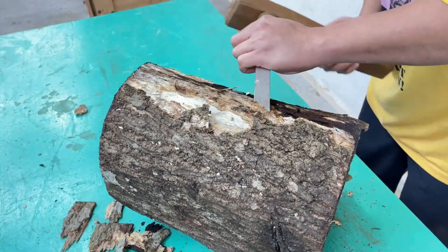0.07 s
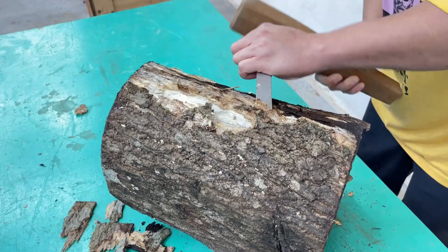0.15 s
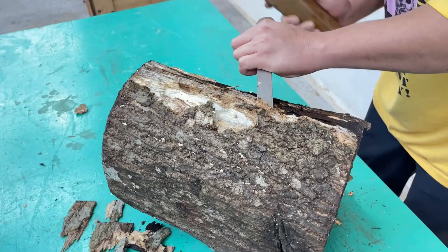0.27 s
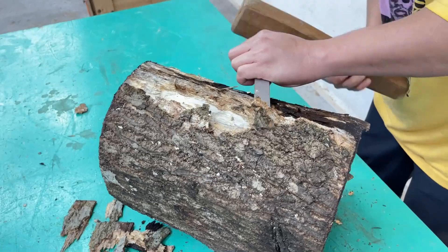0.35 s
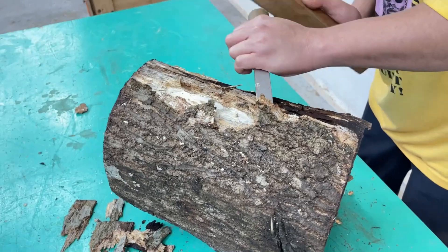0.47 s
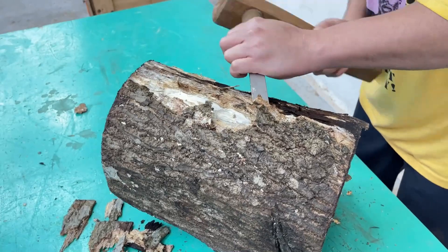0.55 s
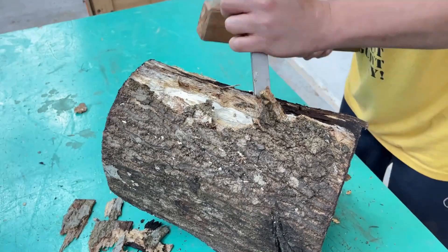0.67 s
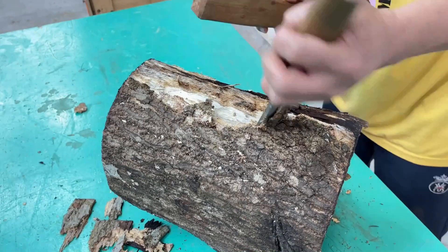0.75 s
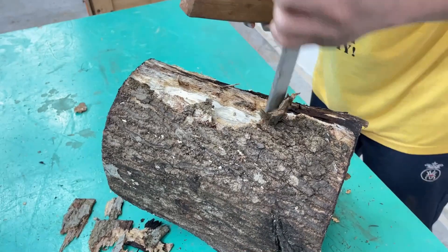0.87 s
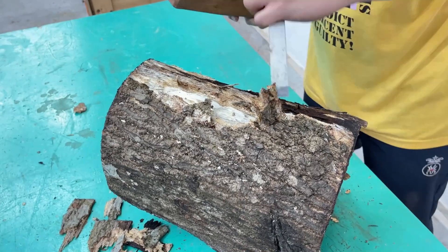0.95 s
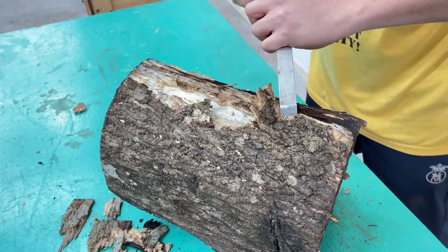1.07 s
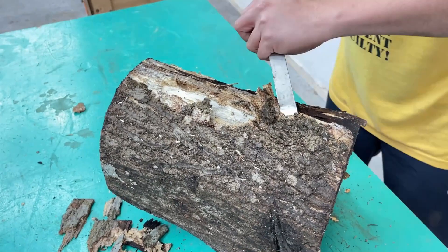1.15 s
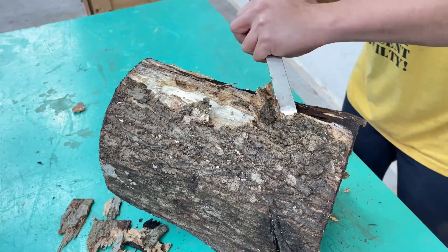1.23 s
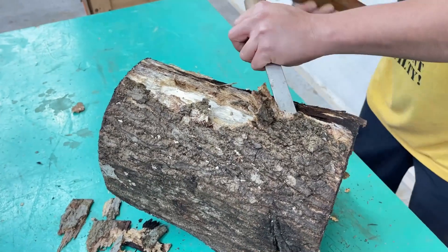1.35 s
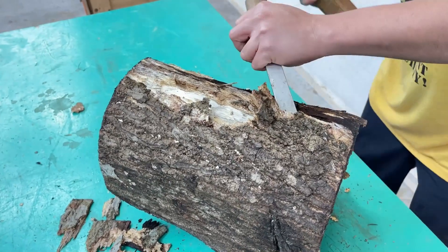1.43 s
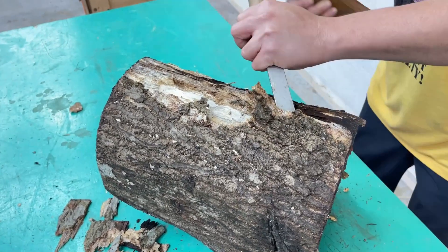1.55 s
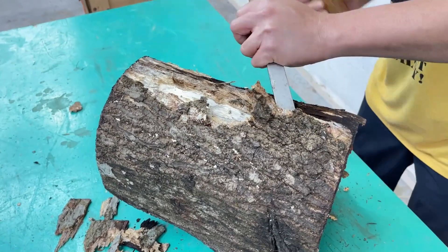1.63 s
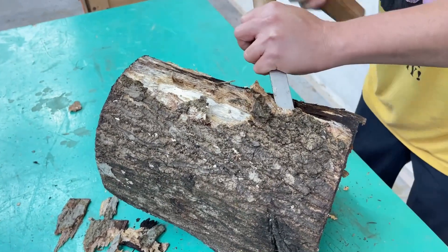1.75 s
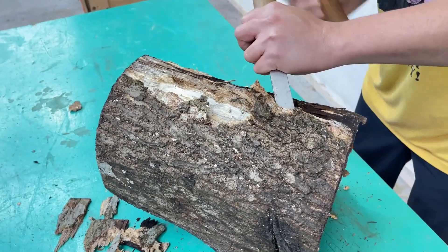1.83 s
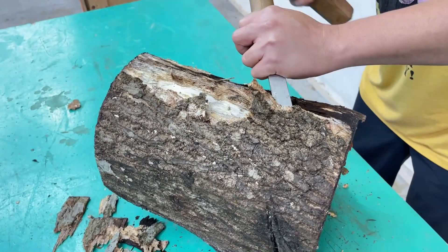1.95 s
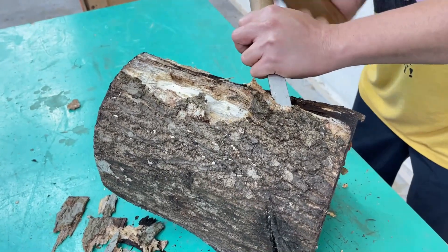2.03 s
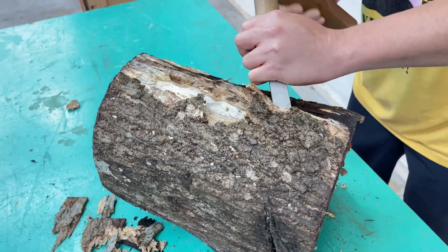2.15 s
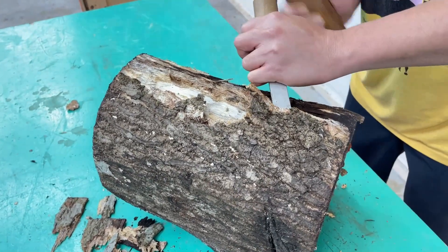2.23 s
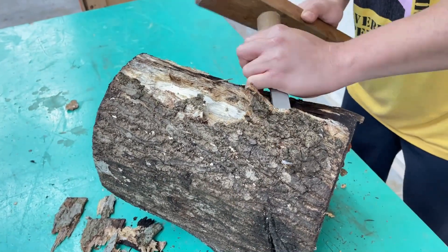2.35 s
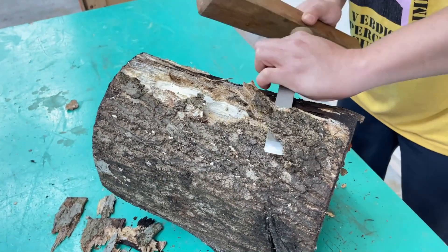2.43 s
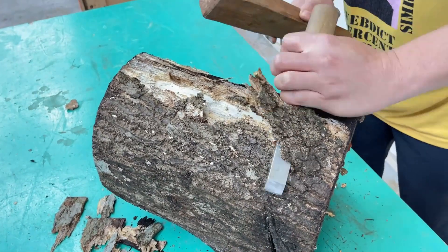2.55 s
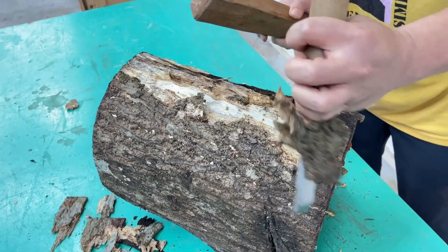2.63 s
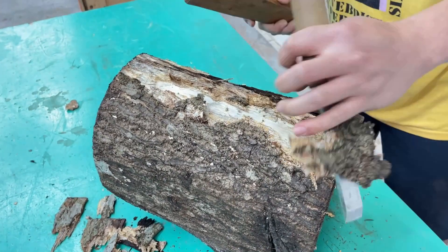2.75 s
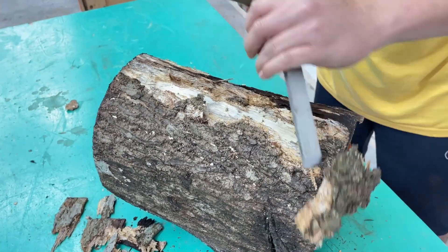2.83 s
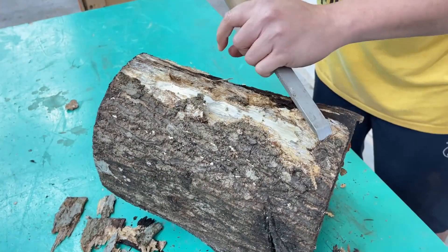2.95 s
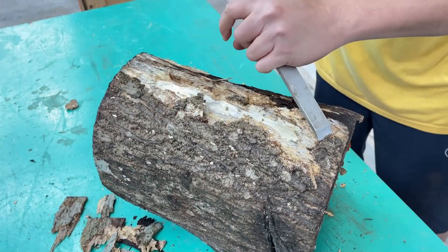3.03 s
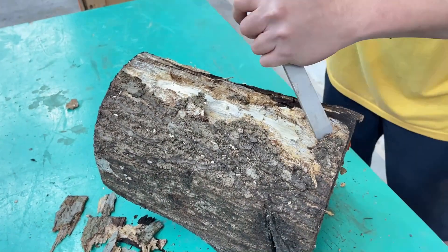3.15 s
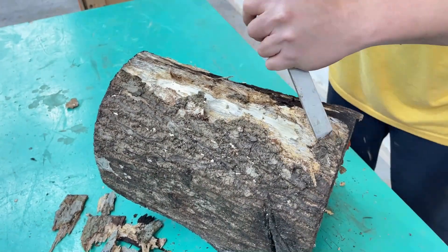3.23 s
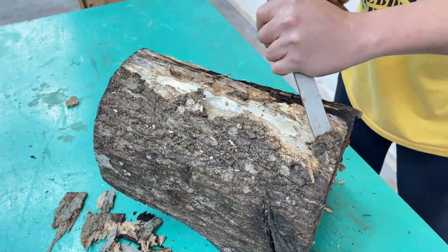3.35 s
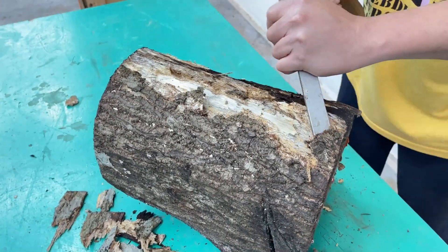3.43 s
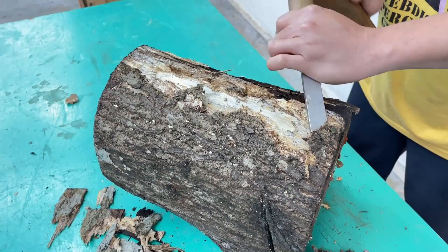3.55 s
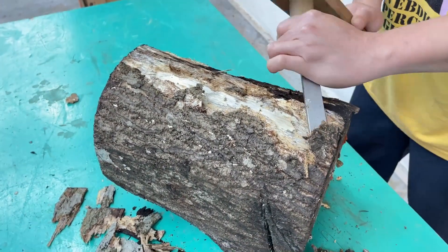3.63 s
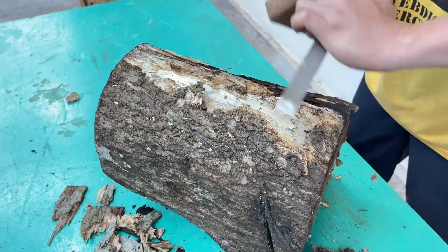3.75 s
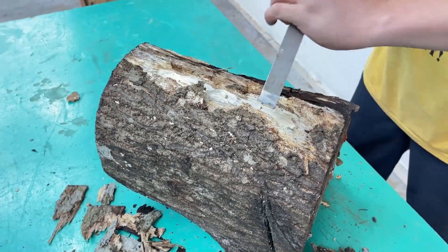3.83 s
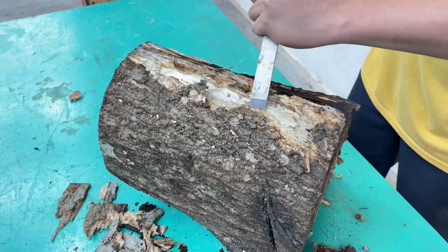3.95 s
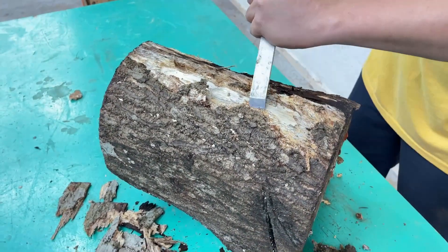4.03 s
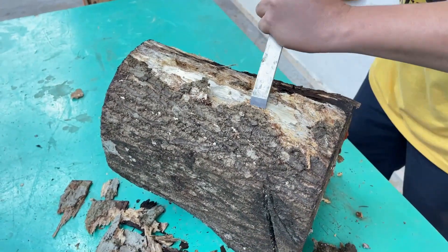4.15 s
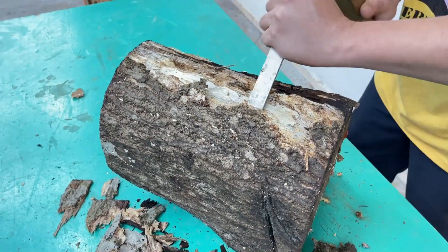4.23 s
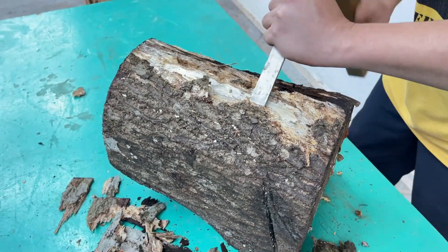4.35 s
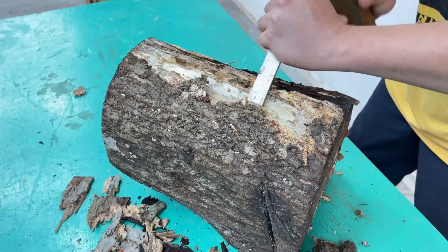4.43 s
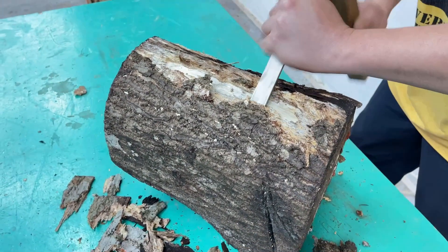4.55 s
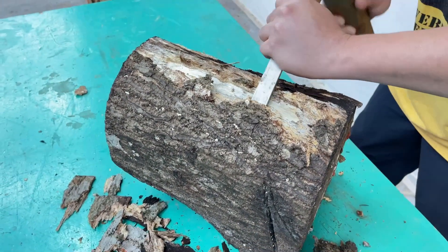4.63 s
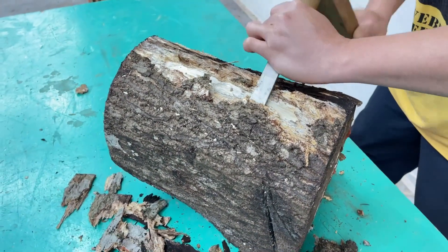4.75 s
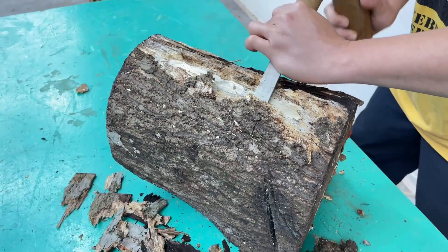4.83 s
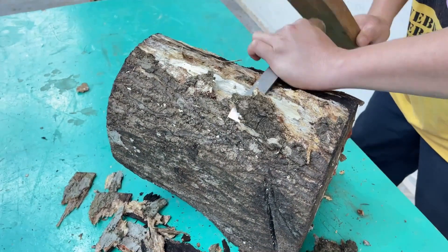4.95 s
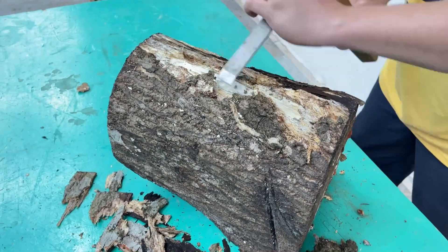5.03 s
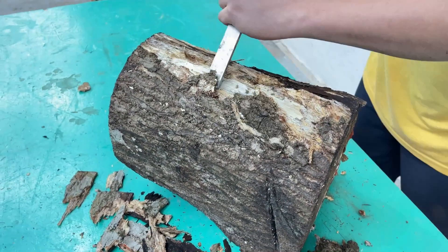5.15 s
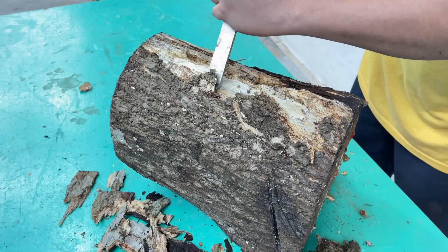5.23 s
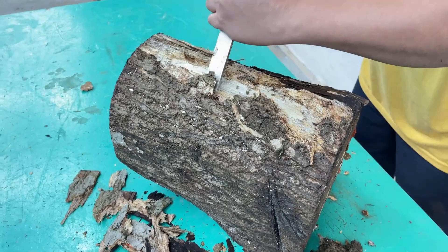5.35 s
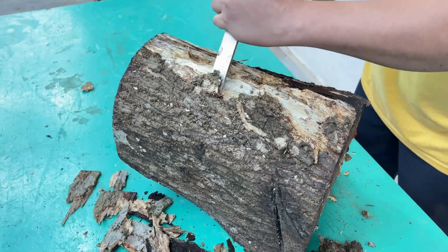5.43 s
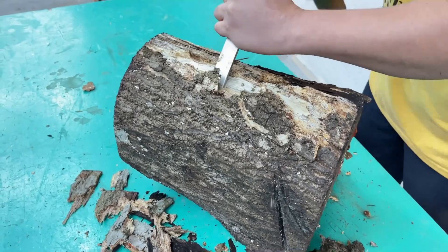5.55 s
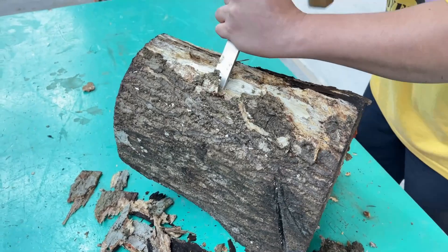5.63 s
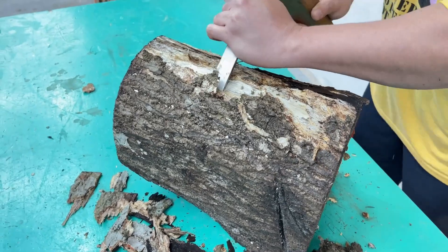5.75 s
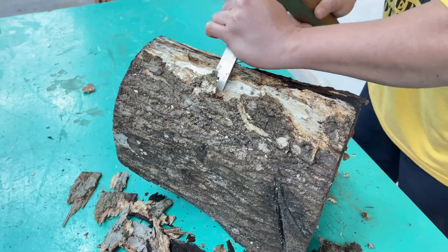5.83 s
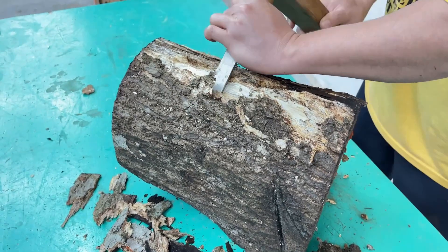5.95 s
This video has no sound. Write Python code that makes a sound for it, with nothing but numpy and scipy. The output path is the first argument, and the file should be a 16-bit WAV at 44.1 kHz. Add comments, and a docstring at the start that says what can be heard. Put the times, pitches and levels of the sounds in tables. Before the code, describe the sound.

A wooden mallet drives a steel blade under log bark in quick, ringing taps, with bark crackling and crumbling between volleys in an echoing workshop.

```python
"""A wooden mallet drives a steel blade under the bark of a log on a workshop table. A volley is under way
at the start: each impact cracks fibres and excites the modes of log, handle, mallet and blade; the hard
walls reverberate, and the rocking log and table thump and rumble. Bark crumbles and falls before and
after a second volley (1.3-2.3 s). At 3 s a freed slab lands with a hollow knock and four blows follow.
Near 4 s the blade scrapes, then eight more blows fall. A faint hiss lies under it all."""
import sys
import numpy as np
from scipy import signal
from scipy.fft import rfft, irfft
from scipy.io import wavfile
from scipy.ndimage import uniform_filter1d

SR = 44100
rng = np.random.default_rng(int(sys.argv[2]) if len(sys.argv) > 2 else 0)


def wav_record(signal):
    """Record a signal, one row per channel, as 16-bit PCM in the file named by sys.argv[1]."""
    frames = np.transpose(np.atleast_2d(signal))
    bounded = np.clip(frames, -1, 1)
    # unit amplitude maps onto the largest positive 16-bit level
    quanta = np.round(bounded * 32767).astype(np.int16)
    wavfile.write(sys.argv[1], SR, quanta)


N = 264159
LEAD = SR // 4  # samples ahead of t = 0, so that a blow already struck still echoes

# Mallet blows: crack t/s, level/dB of handle, blade, crack, log and mallet, force rise t/s, left-right/dB
BLOWS = [(-0.094, -22, -26.5, -19.5, -28.5, -19.5, 0.0035, 16),
         (0.0781, -26.5, -27.5, -20, -32, -29, 0.0095, -6.5),
         (0.2214, -25, -24.5, -18.5, -31, -24, 0.0083, -10), (0.4134, -25, -25, -18, -34.5, -33, 0.007, -1),
         (0.574, -21.5, -20.5, -15, -38.5, -31.5, 0.0058, 14),
         (1.3427, -21, -20, -13, -32.5, -22, 0.0045, -1),
         (1.5458, -20, -22.5, -11.5, -36, -13.5, .0026, -3.5),
         (1.7347, -16.5, -20, -13, -38, -21.5, 0.0026, -3),
         (1.921, -21, -22.5, -15, -42.5, -30.5, 0.0053, 1.5),
         (2.1197, -27.5, -25.5, -18.5, -39, -32, 0.0056, -11),
         (2.3174, -25, -26.5, -16, -44.5, -29.5, 0.0034, -12),
         (3.2515, -33.5, -34.5, -22, -41.5, -21, 0.0067, -2),
         (3.419, -23, -23.5, -13.5, -28.5, -26, 0.0078, -0.5),
         (3.5553, -20.5, -18.5, -9, -38.5, -25, 0.0039, 0.5),
         (3.6702, -27.5, -29.5, -25, -27, -32, 0.0027, 17.5),
         (4.2614, -21, -22, -14, -28.5, -20.5, 0.00296, 7.5),
         (4.4456, -20.5, -21.5, -13, -34, -28.5, 0.0031, 3.5),
         (4.6354, -22.5, -21.5, -11, -33.5, -29, 0.0043, -8.5),
         (4.814, -20, -19, -8, -26, -23.5, 0.0048, -0.5),
         (4.9479, -29.5, -29, -27, -41, -24.5, 0.0065, 16.5),
         (5.3904, -14, -16, -9.5, -23, -19.5, 0.001, 3), (5.575, -24, -22, -16.5, -36, -22, 0.01, -12),
         (5.7453, -27, -24.5, -14, -41, -34, 0.0062, 5)]
# Normal modes of each body: f/Hz, relative level/dB, T60/s
LOG_MODES = [(232.6, 2.5, 0.048), (245.4, 4.5, 0.0093), (377, -2.5, 0.0041)]
HANDLE_MODES = [(529, -1, 0.015), (773, 2, 0.012), (1050, 1, 0.012), (1230, -3, 0.014)]
MALLET_MODES = [(1408, 7.5, 0.034), (1540, -8, 0.022), (1378, -14.5, 0.45)]
BLADE_MODES = [(1690, 3, 0.0071), (1960, 3.5, 0.0045), (2265, 1, 0.0073), (2800, -3.5, 0.0068),
               (2945, -5, 0.018), (3317, -7.5, 0.012), (3740, -6.5, 0.0097), (4740, -11.5, 0.012)]
SLAB_MODES = [(244, 5.5, 0.033), (321.4, -3.5, 0.079), (354, -10, 0.08), (422, -11, 0.14), (600, 1, 0.012),
              (1150, -13.5, 0.01), (1665, -4, 0.0059), (2430, -13.5, 0.0049)]
# Spectrum of breaking fibres: f/Hz, relative level/dB
CRACK_SPECTRUM = [(3500, -23), (4800, -9), (5400, -14), (6300, -10.5), (8000, -14.5), (10500, -15),
                  (11900, -19.5), (12500, -49), (16000, -72.5)]
# Damping of the room, on top of its echo envelope: f/Hz, T60/s
ROOM_DAMPING = [(150, 0.57), (500, 0.94), (1400, 0.82), (3000, 0.36), (6000, 0.7), (11000, 0.7)]
# Spectrum of the echoes: f/Hz, relative level/dB
ROOM_SPECTRUM = [(150, 4.5), (500, -0.5), (1400, 8), (3000, 8.5), (6000, 4), (11000, -0.5), (12500, -20.5)]
# Knocks of the rocking log on the table: t/s, peak level/dB, f/Hz, left-right/dB, left phase lead/cycles
THUMPS = [(0.015, -31, 132, 2, -0.34), (0.088, -30.5, 85, 0.8, -0.13), (0.155, -25.5, 118, 0.5, 0.015),
          (0.234, -28.5, 65.5, 5, -0.28), (0.302, -29, 123, -2, 0.37), (0.496, -19, 109.4, -3, 0.29),
          (0.539, -28.5, 97, -2.5, 0.24), (1.071, -40, 118, -1, -0.37), (1.399, -27.5, 113, 4.5, -0.37),
          (1.652, -29.5, 150, 2, -0.3), (1.8, -34, 119, -7, 0.1), (1.926, -31, 71, 3, -0.21),
          (1.978, -31.5, 120, -2, 0.23), (3.419, -29.5, 67.5, -3, 0.22), (3.779, -33, 108, 6, -0.36),
          (3.798, -43, 197, 0.5, 0.05), (4.362, -30.5, 125, 3.5, 0.25), (4.448, -29.5, 77, -5, 0.17),
          (4.979, -24.5, 70.3, 1, 0.3), (5.468, -37.5, 118, -0.9, -0.024), (5.801, -31, 92, -1, -0.13)]
# Envelope of the underlying rumble: t/s, level/dB
RUMBLE_ENVELOPE = [(0.0, -52.5), (1.18, -59), (1.7, -48.5), (2.62, -60), (4.35, -61.5), (4.44, -55),
                   (5.99, -59.5)]
# Spectrum of the rumble: f/Hz, relative level/dB
RUMBLE_SPECTRUM = [(8.8, -45), (15, -22.5), (54, -2.5), (91, -1.5), (204, -7), (308, -23), (500, -37),
                   (650, -59.5), (1100, -120)]
# Bark flakes tearing or landing: t/s, relative level/dB of snap and of crackle, crackle duration/s
FLAKES = [(0.7014, -40.5, -60, 0.021), (0.734, -45, -48, 0.033), (0.78, -62, -56, 0.054),
          (0.823, -47.5, -59, 0.0073), (0.907, -60, -68.5, 0.06), (0.9811, -61, -56.5, 0.048),
          (1.0143, -51, -64, 0.049), (1.064, -51.5, -66, 0.069), (1.114, -54, -61.5, 0.048),
          (1.1883, -62, -64.5, 0.018), (2.446, -40, -44.5, 0.034), (2.539, -64, -46, 0.14),
          (2.579, -43, -60, 0.049), (2.6364, -51, -49, 0.054), (2.678, -44, -65, 0.019),
          (2.802, -47.5, -64, 0.061), (2.859, -59, -59, 0.011), (2.8715, -49.5, -59.5, 0.039),
          (2.9916, -46, -49, 0.037), (3.079, -57, -70.5, 0.023), (3.155, -64.5, -70, 0.0086),
          (3.2072, -54, -59.5, 0.0091), (3.753, -40, -51, 0.0085), (3.78, -47, -54, 0.0078),
          (3.8838, -57, -62, 0.015), (3.95, -60, -67.5, 0.0071), (5.1808, -50, -56.5, 0.022),
          (5.329, -62, -68, 0.013), (5.931, -51, -56, 0.046), (5.9714, -63, -51, 0.032)]
# Spectrum of crumbling bark: f/Hz, relative level/dB
BARK_SPECTRUM = [(880, -10), (1500, -4.5), (1830, -10), (2700, -8.5), (4520, -8), (7600, -11), (10300, -2),
                 (11200, -4.5), (12100, -24), (15800, -19), (22000, -120)]
# Slides of the blade: start t/s, duration/s, highest level/dB
SCRAPES = [(3.945, 0.098, -71), (4.1, 0.25, -74)]
# Resonances of the sliding blade: f/Hz, bandwidth/Hz, relative level/dB
SCRAPE_BANDS = [(3660, 1100, 8), (5630, 480, 6)]
# Spectrum of the background hiss: f/Hz, relative level/dB
HISS_SPECTRUM = [(180, -35), (300, -20.5), (600, -24.5), (930, -21.5), (1150, -28), (1400, -27.5),
                 (1700, -34.5), (2100, -30), (3000, -37.5), (12000, -42), (13000, -71), (22000, -120)]


def hammering(mix, room_db=1.5, room_compression=0.77):
    """Direct plus reverberant field: the worker moves, so each blow has its own echo pattern."""
    for start, *levels_db, rise_s, side_db in BLOWS:
        direct, to_walls = blow(*levels_db, rise_s)
        add(mix, start - rise_s, pan(side_db) * direct)
        to_walls /= np.linalg.norm(to_walls) ** room_compression  # soft and hard blows echo almost alike
        add(mix, start, gain_of(room_db) * room(to_walls))


def blow(handle_db, blade_db, crack_db, log_db, mallet_db, rise_s):
    """Impact excitation: one force pulse drives all parts. Returns direct and wall-bound sound."""
    t = np.arange(18000) / SR
    since_peak = t - rise_s - 0.0015
    force = np.minimum(t / (rise_s + 0.0015), 1) ** 2 * np.exp(-np.maximum(since_peak, 0) / 0.0016)
    crack = gain_of(crack_db) * fibre_crack(force, since_peak)
    log = gain_of(log_db) * ring(LOG_MODES, force, detune=0.055, smooth=True)
    handle = gain_of(handle_db) * ring(HANDLE_MODES, force, detune=0.055)
    mallet = gain_of(mallet_db) * ring(MALLET_MODES, force, detune=0.0077, smooth=True)
    mallet[1] *= gain_of(-3)  # directivity: the mallet radiates less towards the walls
    blade = gain_of(blade_db) * ring(BLADE_MODES, force, detune=0.023)
    direct, to_walls = np.stack([log, handle, mallet, blade, crack], axis=1)
    return direct.sum(0), diffuse(to_walls[:, 0])


def fibre_crack(force, since_peak, splinters_per_s=900, splinter_db=-14, splinter_s=0.01):
    """Brittle fracture: fibres break at peak force, then splinter. Returns direct and wall-bound sound."""
    tick = np.exp(-abs(since_peak) / 0.0006)
    bursts = signal.lfilter([1], [1, -0.97], rng.random(len(force)) < splinters_per_s / SR)
    fade = (since_peak > 0) * np.exp(-np.maximum(since_peak, 0) / splinter_s)
    envelope = tick + 0.26 * force + gain_of(splinter_db) * bursts * fade
    crack = coloured(noise(len(force)) * envelope, CRACK_SPECTRUM)
    crack /= abs(crack).max()
    click = coloured(signal.unit_impulse(len(force), 100) * np.ones((2, 1)), CRACK_SPECTRUM)
    return np.array([crack, match_energy(click, crack)])


def ring(modes, force, detune, smooth=False, scatter_db=2.5):
    """Modal superposition: force convolved with damped modes. Returns direct and wall-bound sound."""
    t = np.arange(len(force)) / SR
    hz, db, t60 = np.transpose(modes)[:, :, None]
    hz = hz * (1 + detune * rng.standard_normal(hz.shape))  # each blow lands elsewhere
    sign = (-1) ** np.arange(len(modes))[:, None]  # neighbouring modes swing in antiphase
    waves = sign * gain_of(db - 60 * t / t60) * np.sin(2 * np.pi * hz * t)
    response = (gain_of(scatter_db * rng.standard_normal((2, len(modes), 1))) * waves).sum(1)
    drive = noise(len(t)) ** 3  # a few hard contacts
    drive = drive + 0.23 * drive[::-1]  # partly common to both sides
    if smooth:  # driven at its first mode, the ring swells evenly
        drive = np.sin(2 * np.pi * (hz[0] * t + rng.random((2, 1))))
    direct = unit_burst(signal.fftconvolve(response, force * drive, axes=1)[:, :len(t)])
    return np.array([direct, match_energy(diffuse(waves), direct)])


def diffuse(waves):
    """Incoherent summation: powers add without cancelling, in one minimum-phase pulse for both sides."""
    power = (abs(rfft(waves)) ** 2).sum(0)
    cepstrum = irfft(0.5 * np.log(power + 1e-9))
    half = len(cepstrum) // 2
    cepstrum[1:half] *= 2  # folding onto positive time makes the pulse causal
    cepstrum[half + 1:] = 0
    return irfft(np.exp(rfft(cepstrum))) * np.ones((2, 1))


def room(x, early_db=-9.5, early_s=0.03, late_db=-16, hold_s=0.22, drop_s=0.027):
    """Reverberation: sparse reflections of random sign, each band decaying at its own rate."""
    size = SR * 3 // 4
    echoes = np.zeros((2, size))
    arrivals = np.arange(180, size - 20, 20) + rng.integers(0, 20, (2, (size - 181) // 20))
    np.put_along_axis(echoes, arrivals, rng.choice([-1., 1.], arrivals.shape), 1)
    delay = np.arange(size) / SR
    echoes *= gain_of(early_db * (1 - np.exp(-delay / early_s)))  # a quick fade to a plateau
    echoes *= gain_of(late_db / (1 + np.exp((hold_s - delay) / drop_s)))  # the plateau ends
    hz, t, bands = signal.stft(echoes, SR, nperseg=256)
    bands *= gain_of(curve_at(ROOM_SPECTRUM, hz)[:, None] - 60 * t / curve_at(ROOM_DAMPING, hz)[:, None])
    response = signal.istft(bands, SR, nperseg=256)[1]
    return signal.fftconvolve(x, response / np.linalg.norm(response[0]), axes=1)


def falling_slab(mix, start=2.9952, level_db=-28.5, room_db=-10, right_lag_s=0.00071):
    """Modal build-up: as bark hits the table each mode needs part of a cycle, so tick precedes thud."""
    t = np.maximum(np.arange(8000) / SR - np.array([[[0]], [[right_lag_s]]]), 0)
    hz, db, t60 = np.transpose(SLAB_MODES)[:, :, None]
    rise = (1 - np.exp(-t * hz / 0.63)) ** 2
    waves = rise * gain_of(db - 60 * t / t60) * np.cos(2 * np.pi * hz * t)
    direct = gain_of(level_db) * unit_burst(waves.sum(1))
    add(mix, start, direct)
    add(mix, start, gain_of(room_db) * room(direct))


def table_thumps(mix, t60=0.058, rise_s=0.0058):
    """Heavily damped oscillation: the rocking log knocks the table into a few low swings."""
    t = np.arange(5000) / SR
    envelope = gain_of(-60 * t / t60) * (1 - np.exp(-t / rise_s)) ** 2
    for start, db, hz, side_db, phase_lead in THUMPS:
        swing = envelope * np.sin(2 * np.pi * (hz * t + rng.random() + [[phase_lead], [0]]))
        add(mix, start, gain_of(db) * pan(side_db) * swing / abs(swing).max())


def table_rumble(mix, rocking_db=-44.5, rocking_t60=0.79):
    """Random vibration: lumpy low noise swells and decays as the log rocks after each blow."""
    times, db = np.transpose(RUMBLE_ENVELOPE)
    t = np.arange(times[0], times[-1], 1 / SR)
    underlying = gain_of(np.interp(t, times, db)) * signal.windows.tukey(len(t), 900 / len(t))
    age = np.maximum(t - np.array(BLOWS)[:, :1], 0)
    rocking = gain_of(rocking_db - 60 * age / rocking_t60) * (1 - np.exp(-age / 0.0015))
    lumpy = gain_of(4.8 * slow_noise(len(t), 900)) * noise(len(t))
    add(mix, times[0], unit_rms(coloured(lumpy, RUMBLE_SPECTRUM)) * (underlying + rocking.sum(0)))


def crumbling_bark(mix, grains_per_s=700):
    """Crackling noise: a flake snaps or lands, then a Poisson train of tiny bursts swells and dies."""
    t = np.arange(8192) / SR
    for start, snap_db, crackle_db, duration in FLAKES:
        snap = gain_of(snap_db) * np.exp(-t / 0.0058) * (1 - np.exp(-t / 0.0005))
        strengths = gain_of(3 * np.minimum(rng.exponential(1, len(t)), 4))
        grains = strengths * (rng.random(len(t)) < grains_per_s / SR)
        bursts = unit_rms(1.2 + signal.lfilter([1], [1, -0.985], grains))
        crackle = gain_of(crackle_db) * bursts * np.exp(-(t / duration) ** 2) * np.minimum(t / 0.006, 1)
        hiss = pan(3 * rng.standard_normal()) * unit_rms(coloured(noise(len(t)), BARK_SPECTRUM))
        add(mix, start, hiss * (snap + crackle) / 2)


def blade_scrapes(mix):
    """Sliding friction: steel on wood makes noise, filtered by two broad resonances."""
    for start, duration, db in SCRAPES:
        t = np.arange(0, duration, 1 / SR)
        friction = noise(len(t))
        scrape = sum(gain_of(band_db) * resonate(friction, hz, width) for hz, width, band_db in SCRAPE_BANDS)
        add(mix, start, gain_of(db) * np.sin(np.pi * t / duration) * unit_rms(scrape))


def background_hiss(mix, level_db=-70.5, waver_db=2.5):
    """Random amplitude modulation: a quiet hiss wavers."""
    gain = gain_of(level_db + waver_db * slow_noise(N, 2500))
    add(mix, 0, gain * unit_rms(coloured(noise(N), HISS_SPECTRUM)))


def resonate(x, hz, width):
    """Heterodyne band-pass: shifts hz down to zero, smooths twice and shifts back."""
    carrier = np.exp(2j * np.pi * hz * np.arange(1, x.shape[-1] + 1) / SR)
    pole = np.exp(-np.pi * width / SR)
    return 2 * (carrier * signal.lfilter([(1 - pole) ** 2], [1, -2 * pole, pole ** 2], x / carrier)).real


def coloured(x, spectrum):
    """Zero-phase filtering by a curve of f/Hz, level/dB."""
    size = x.shape[-1]
    return irfft(rfft(x) * gain_of(curve_at(spectrum, np.fft.rfftfreq(size, 1 / SR))), size)


def curve_at(points, hz):
    f, value = np.transpose(points)
    return np.interp(np.log(hz + 1), np.log(f + 1), value)


def noise(size):
    return rng.standard_normal((2, size))


def slow_noise(size, window):
    return unit_rms(uniform_filter1d(noise(size), window))


def gain_of(db):
    return 10 ** (np.asarray(db) / 20)


def pan(db):
    return gain_of([[db / 2], [-db / 2]])


def unit_rms(x):
    return x / np.sqrt(np.mean(x ** 2) + 1e-20)


def unit_burst(x):
    """Normalisation: the loudest 5 ms get rms 1."""
    return x / np.sqrt(uniform_filter1d((x ** 2).mean(0), 220).max())


def match_energy(x, model):
    return x * np.linalg.norm(model) / np.linalg.norm(x)


def add(mix, start, sound):
    part = mix[:, LEAD + round(start * SR):][:, :sound.shape[1]]
    part += sound[:, :part.shape[1]]


def scene():
    """Linear superposition: the pressures of all sources add."""
    mix = np.zeros((2, N + LEAD))
    for source in (hammering, falling_slab, table_thumps, table_rumble,
                   crumbling_bark, blade_scrapes, background_hiss):
        source(mix)
    return mix[:, LEAD:]


def record(dry, ceiling=0.9, cutoff_hz=16000):
    """Soft saturation rounds the highest peaks; a low-pass filter then limits the band."""
    rounded = ceiling * np.tanh(dry / ceiling)
    low_pass = signal.firwin(255, cutoff_hz, window=("kaiser", 9), fs=SR)
    return signal.oaconvolve(rounded, low_pass[None], "same")


dry = scene()
out = record(dry)
wav_record(out)
```